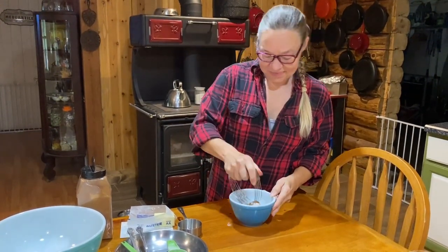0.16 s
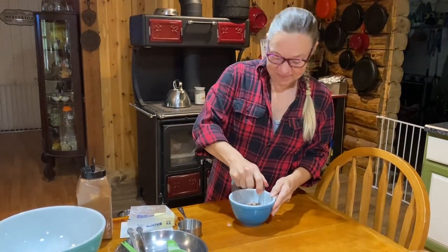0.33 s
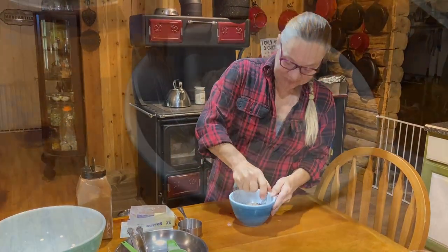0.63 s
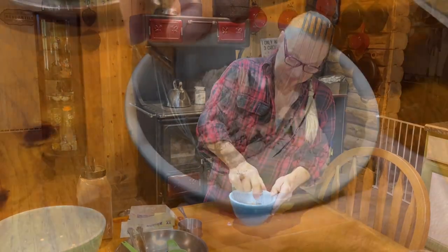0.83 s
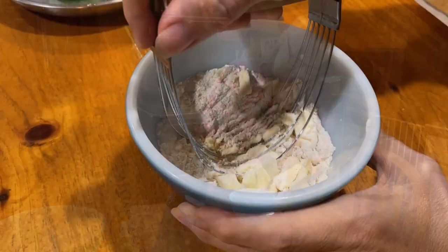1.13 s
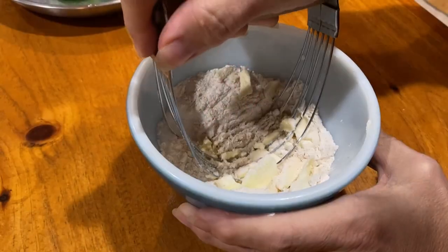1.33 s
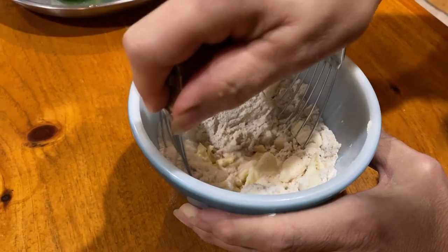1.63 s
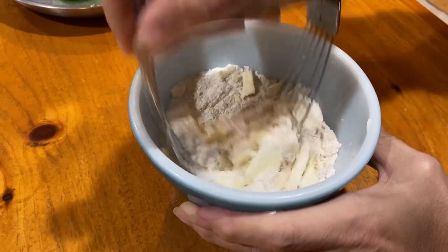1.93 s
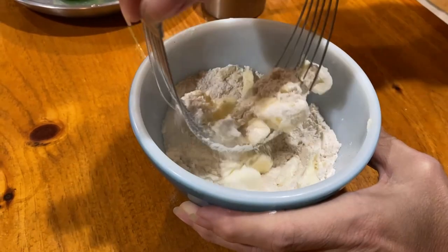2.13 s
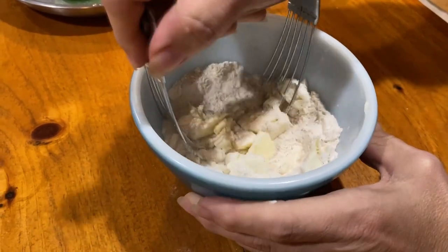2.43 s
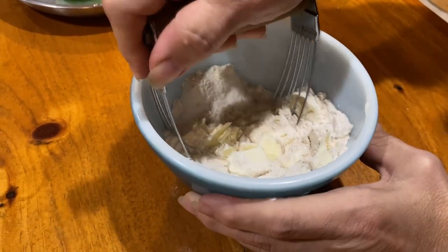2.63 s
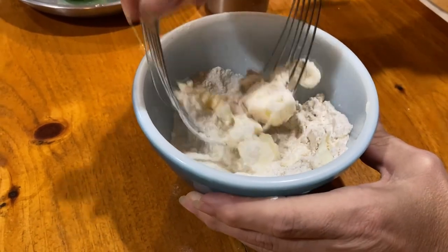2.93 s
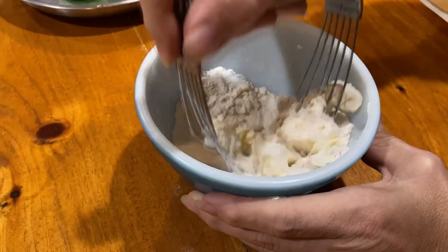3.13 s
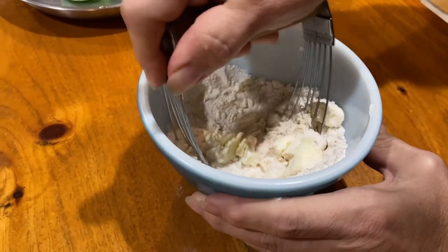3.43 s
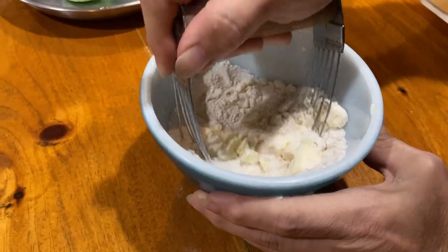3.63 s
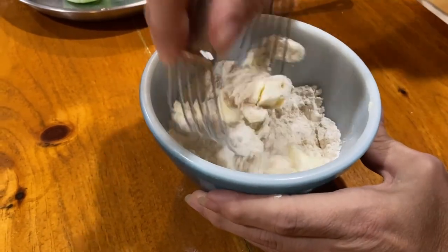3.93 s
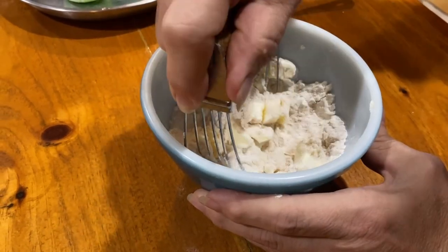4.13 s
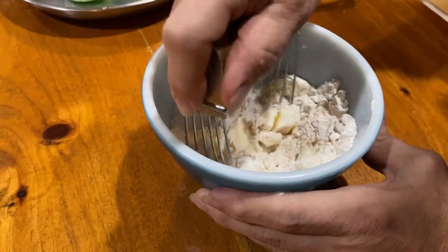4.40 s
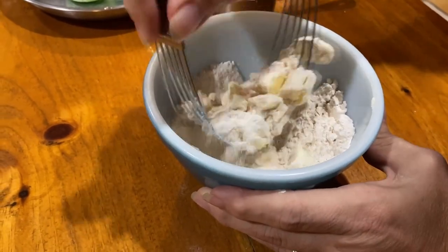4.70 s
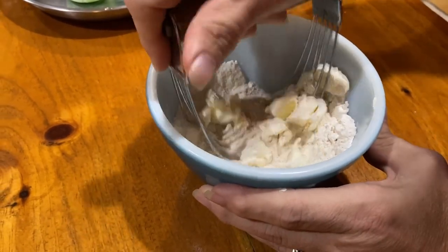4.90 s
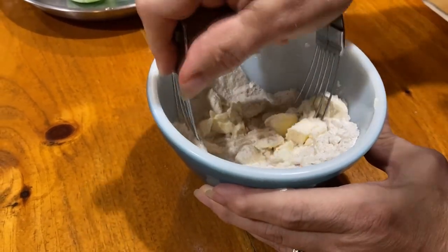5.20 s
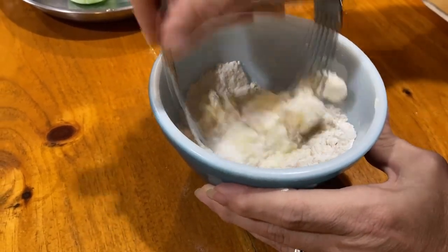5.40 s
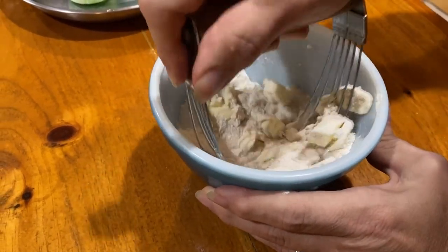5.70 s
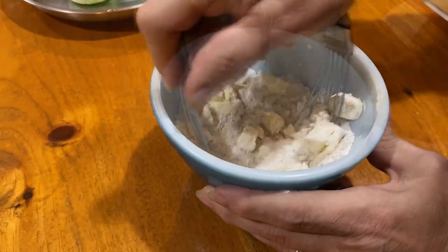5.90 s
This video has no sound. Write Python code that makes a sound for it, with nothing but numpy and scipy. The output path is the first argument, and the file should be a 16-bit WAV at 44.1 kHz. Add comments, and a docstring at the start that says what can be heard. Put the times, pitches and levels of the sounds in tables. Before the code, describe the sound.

A quiet wooden kitchen, heard in stereo on a phone. From 0 to 0.8 seconds it is far off: very faint taps and tiny knocks of a bowl on a table, with room reverberation. At 0.9 a stronger knock lands and the sound turns close, above the bowl, with soft room noise, low fridge hum and faint whine. Wires scrape grittily at 1.05 and 1.65, with ticks and a soft thump. From 2.15 to 2.65 a busy cluster of scrapes, clinks and heavy dull thuds follows. It eases into light scraping near 3, then a sharp click and thuds at 3.5 to 3.7. The hardest clacks and table knocks come at 4.2 to 4.3. Small ticks and scrapes follow; at 5.0 a thump and brief metallic wire twang, more strokes to 5.3, scrapes at 5.6 and a final tick and thud at 5.9.

```python
"""Faint ticks and knocks come first, heard by a phone across a wooden table, then all is close above a glass bowl.
Steel wires of a pastry cutter chop through flour and butter: cracks and ringing modes make the ticks,
filtered grains the scrape, and damped modes the thumps that each push sends into the table top.
Twanging wires are ringing noise, the fridge two wavering sines over noise, the wooden room a decaying noise tail."""
import sys
import numpy as np
from scipy import signal
from scipy.fft import rfft, irfft, next_fast_len
from scipy.io import wavfile
from scipy.ndimage import uniform_filter1d

SR = 44100
rng = np.random.default_rng(int(sys.argv[2]) if len(sys.argv) > 2 else 0)


def transcribe(u):
    """Save the signal u as a 16-bit wav file named by the first command-line argument.

    u: samples, shape (n,) or (channels, n), limited to [-1, 1]; the rate is SR.
    q: integer samples, one column per channel.
    """
    v = np.clip(np.atleast_2d(u).T, -1, 1)
    q = np.round(v * 32767).astype(np.int16)
    wavfile.write(sys.argv[1], SR, q)


N = 267025
CLOSE_FROM_S = .98  # heard from close above the bowl from here on


def undb(db):
    """dB to gain."""
    return 10 ** (np.asarray(db, float) / 20)


def unit(x):
    """Scale to rms 1."""
    return x / np.sqrt(np.mean(x ** 2))


def curve(s, v):
    """Straight lines between control points in seconds."""
    return np.interp(np.arange(N) / SR, s, v)


def colour(x, points):
    """Filter by (Hz, dB) points joined on a log frequency axis."""
    size = next_fast_len(x.shape[-1])
    hz = np.maximum(np.arange(size // 2 + 1) * SR / size, 1)
    p = np.array(points)
    gain = undb(np.interp(np.log(hz), np.log(p[:, 0]), p[:, 1]))
    return irfft(rfft(x, size) * gain, size)[..., :x.shape[-1]]


def band(x, lo_hz, hi_hz):
    """Band-pass."""
    return signal.sosfilt(signal.butter(3, [lo_hz, hi_hz], "bandpass", fs=SR, output="sos"), x)


def ring(x, hz, t60):
    """Drive one damped mode with x; a unit impulse gives amplitude 1."""
    w = 2 * np.pi * hz / SR
    r = np.exp(-np.log(1000) / (max(t60, .005) * SR))
    return signal.lfilter([0, np.sin(w)], [1, -2 * r * np.cos(w), r * r], x)


def grit(rate_hz, scatter_db):
    """Sparse random impulses of very uneven size, like grains."""
    on = rng.random(N) < rate_hz / SR
    impulses = on * rng.standard_normal(N)
    size_db = scatter_db * np.minimum(rng.exponential(size=N), 5.5)
    return unit(impulses * undb(size_db))


def walk(rate_hz):
    """Random movement: new random levels at this rate, joined by straight slews."""
    hold = int(SR / rate_hz)
    levels = np.repeat(rng.standard_normal(N // hold + 1), hold)
    return uniform_filter1d(levels, hold)[:N]


def burst(s, db, rise_ms, fall_ms):
    """Envelope of bursts that swell up to their moment and die away, both exponentially."""
    gate = np.zeros(N)
    gate[(np.asarray(s) * SR).astype(int)] = undb(db)
    t_ms = np.arange(-SR // 2, SR // 2 + 1) * 1000 / SR
    shape = np.exp(-np.abs(t_ms) / np.where(t_ms < 0, rise_ms, fall_ms))
    return np.abs(signal.fftconvolve(gate, shape, "same"))


def strike(blows, modes, spot_db, detune, rise_ms, choke_ms=np.inf):
    """Ring damped modes for each (s, dB for each mode); level and pitch of each mode scatter from blow to blow."""
    hz, mode_db, t60 = np.transpose(modes)[:, :, None]
    t = np.arange(SR // 2) / SR
    out = np.zeros(N + len(t))
    chance = rng.standard_normal((len(blows), 2, len(modes), 1))
    for (s, db), (spot, shift) in zip(blows, chance):
        decay = undb(db + mode_db + spot_db * spot - 60 * t / t60)
        rings = decay * np.sin(2 * np.pi * hz * (1 + detune * shift) * t)
        at = int(s * SR)
        out[at:at + len(t)] *= np.exp(-t * 1000 / choke_ms)  # still what rang before
        out[at:at + len(t)] += rings.sum(axis=0) * (1 - np.exp(-t * 1000 / rise_ms))
    return out[:N]


# Colour of the room tone. Each row: frequency in Hz, level in dB per Hz.
ROOM_TONE_COLOUR = [(15, -31), (25, 3.5), (48, -12.5), (309, -9.5), (363, -1), (414, -14.5), (6330, -25),
                    (14000, -55.5)]
# Room tone level over time: faint in the far shot, rising into the louder close one.
# Each row: time in seconds, level in dB.
ROOM_TONE_LEVEL = [(0, -80.5), (.45, -75), (.9, -65.5), (6.05, -66)]
# Fridge hum and whine. Each row: frequency in Hz, level in dB over the room tone.
FRIDGE_HUM = [(60, 8), (720, -1)]


def kitchen():
    """Wide noise as room tone with a wavering fridge hum; its high whine is heard only from close up."""
    mid, side = (unit(colour(rng.standard_normal(N), ROOM_TONE_COLOUR)) for _ in range(2))
    t = np.arange(N) / SR
    hum = np.zeros(N)
    for hz, db in FRIDGE_HUM:
        heard = (hz < 100) | (t > CLOSE_FROM_S)
        hum += undb(db + walk(37.0)) * np.sin(2 * np.pi * hz * t) * heard
    wide = 1.38 * side * np.array([[1], [-1]])
    return undb(curve(*np.transpose(ROOM_TONE_LEVEL))) * (mid + wide + hum)


ROOM_T60_S = 0.44  # bass decay; the treble's is 0.82 of it


def room(x):
    """Diffuse tail of the wooden room, shorter in the treble; the bass is alike left and right."""
    t = np.arange(SR // 2) / SR
    noise = rng.standard_normal((2, len(t))) * np.minimum(t / 0.0016, 1)
    low = signal.sosfilt(signal.butter(1, 400, fs=SR, output="sos"), noise)
    bass = low[0] * undb(-60 * t / ROOM_T60_S)
    treble = 0.8 * (noise - low) * undb(-60 * t / (0.82 * ROOM_T60_S))
    tail = bass + treble
    return signal.fftconvolve(x[None], tail / np.sqrt(np.sum(tail ** 2) / 2), axes=1)[:, :N]


CHOKE_MS = 8  # a new knock presses the top and stills what rang before
ROCK_DB, ROCK_RISE_MS, ROCK_FALL_MS = -23, 5.8, 43.2  # rocking around each knock, level against the knock
RUB_DB = 2  # rub of the bowl on the top, against the dull part of the scrape
# The bowl knocking on the table top; each knock has its own brightness, whatever its level. # Each row: start
# in seconds, level in dB, extra level of the upper modes in dB.
THUDS = [(0.122, -51, -4), (0.247, -47, -1), (0.51, -47, 6), (0.573, -44, 1), (0.707, -44.5, -5),
         (0.893, -4.5, 9), (1.639, -16.5, -8), (1.851, -20, 5), (2.174, -16.5, -2), (2.265, -12.5, 4),
         (2.313, -12, -13), (2.506, -1.5, -12), (2.548, -5, -6), (2.621, -7.5, 5.5), (2.844, -53, -8),
         (3.501, -6.5, -21.5), (3.534, -7.5, -23), (3.65, 1.5, 0), (3.687, -12.5, 8.5), (4.01, -24.5, -12),
         (4.188, -1, -8.5), (4.293, 3, -5), (4.332, 1.5, 2), (4.762, -11.5, -4), (5.017, -7, -8),
         (5.255, -20.5, -1.5), (5.874, -13.5, -3.5)]
# Modes of the table top. Each row: frequency in Hz, level in dB, 60 dB decay time in seconds.
TABLE_MODES = [(127.4, 5.5, 0.26), (152.4, 1.5, 0.22), (204, -3, 0.14), (263.5, -3.5, 0.19),
               (322.5, -24, 0.22), (376, -13, 0.1), (540, -26.5, 0.035)]


def table(dull_db):
    """Pushes ring the modes of the table top, and the bowl rocks and rubs on it as grit through the same modes."""
    mode_hz = np.array(TABLE_MODES)[:, :1]
    deep, high = mode_hz < 140, mode_hz > 180
    # the deepest modes reach the phone mostly when it is close above the top
    blows = [(s, db - 16.5 + upper_db * high - 12.5 * deep * (s < CLOSE_FROM_S))
             for s, db, upper_db in THUDS]
    knocks = band(strike(blows, TABLE_MODES, 2.94, 0.034, 5.4, CHOKE_MS), 70, 3300)

    # from afar the whole top and what stands on it rattle along: many dense modes, made as noise
    s, db, _ = np.transpose([row for row in THUDS if row[0] < CLOSE_FROM_S])
    dense = colour(rng.standard_normal(N), [(150, 15.5), (400, -8.5), (3000, -36.0)])
    rattle = burst(s, db - 5.5, 0.69, 35.2) * unit(band(dense, 263, 2500))

    rub = grit(300, 1.2)
    rubbed_top = sum(undb(mode_db) * ring(rub, hz, 0.32 * t60) for hz, mode_db, t60 in TABLE_MODES)
    s, db, _ = np.transpose(THUDS)
    rocking = burst(s, db + ROCK_DB, ROCK_RISE_MS, ROCK_FALL_MS)
    movement = np.hypot(rocking, undb(dull_db + RUB_DB))
    return knocks + rattle + movement * unit(rubbed_top)


# Single wires springing free or knocking together.
# Each row: time in seconds, pitch in Hz, level in dB, 60 dB decay time in seconds.
TWANGS = [(1.052, 1986, -31.5, .14), (3.377, 1830, -37, 0.037), (5.0126, 1220, -17.5, 0.046),
          (5.0143, 6580, -22, 0.018), (5.099, 6800, -41.5, 0.022), (5.161, 1280, -39, 0.046),
          (5.264, 3510, -37, 0.13)]


def twangs():
    """Each wire buzzes briefly against its neighbours: noise ringing around its own pitch."""
    out = np.zeros(N)
    for s, hz, db, t60 in TWANGS:
        buzz = unit(ring(rng.standard_normal(N), hz, 0.2 * t60))
        out += burst([s], db, 0.92, 1000 * t60 / np.log(1000)) * buzz
    return out


CHATTER_DB, CHATTER_HZ = 2.5, 130  # depth and rate of the wavering ring
JANGLE_DB, JANGLE_MS, JANGLE_UP = -11, 65, 0.01  # level against the ring, fall, rise in pitch (share)
JANGLE_FORCE = 0.26  # extra dB of jangle for each dB of blow: hard landings slide on, light ones just ping
GRIP_DETUNE = .007  # typical share by which the grip shifts the glass modes
# Wires striking the glass. Each row: start in seconds, crack level in dB, low body in dB,
# glass ring in dB, brightness in dB per octave.
TICKS = [(0.119, -44.5, -29, 2.5, -7), (0.7924, -66, -8, 7, 12.5), (0.8922, -28, 3.5, -18, -33),
         (1.047, -31.5, -34.5, -29, 3), (1.645, -28, -4.5, -35, -3), (1.85, -68.5, 28, -8, 0),
         (2.161, -25.5, -18, -0.5, 0), (2.2746, -37.5, 5, -5, -4), (2.4666, -37.5, 8, -11, -15),
         (2.4976, -21.5, 0, -20, -18.5), (2.5183, -31.5, 19.5, -5.5, -21), (2.566, -30.5, 0, -20, -31),
         (2.842, -50, -3, -31, -23), (3.4982, -15, -38, -11, -11), (3.6454, -46.5, 17, -14, -34),
         (4.0905, -42.5, 3, -2.5, -20.5), (4.1915, -13, 4, -14, -24), (4.2889, -14.5, -1, -14.5, -20.5),
         (4.4582, -54.5, 1, 12, 0), (4.482, -55, 15.5, -46, -12), (4.514, -56, -13, 17.5, -4),
         (4.598, -63.5, 17.5, -35, -13), (5.014, -44, 5, -42, -6), (5.1546, -32.5, 0.5, -24, -7.5),
         (5.2502, -26.5, -11.5, -8.5, -11.5), (5.61, -38.5, -27, 4.5, -7.5), (5.8799, -23.5, -26, -60, -13)]
# Modes of the filled glass bowl, shared with the scrape.
# Each row: frequency in Hz, level in dB, 60 dB decay time in seconds.
BOWL_MODES = [(680, -10, .05), (880, 6, .02), (1000, -5, .07), (1110, -6, .06), (1950, -14, .025),
              (2660, -2, .04), (2770, -1, .05), (5030, 2, .07), (5190, -1, .06), (7960, -9, .05)]
# Colour of a bare contact, shared with the scrape. Each row: frequency in Hz, level in dB per Hz.
CONTACT_COLOUR = [(240, -64.5), (400, -8.5), (900, 5.5), (3210, -8.5), (5200, -8), (7100, -11), (9210, -27),
                  (12300, -20.5), (15500, -39)]


def ticks():
    """Each blow: a short crack as the wires land, the low body of the filled bowl and its glass ring."""
    s, db, _, glass_db, tilt = np.transpose(TICKS)
    noise = colour(rng.standard_normal(N), CONTACT_COLOUR)
    dark, light = unit(band(noise, 1300, 4000)), unit(band(noise, 4000, 15000))
    crack = burst(s, db - 13.5 - tilt / 2, 1.6, 3.9) * dark
    crack += burst(s, db - 0.5 + tilt / 2, 1.6, 1.76) * light

    # after landing the wires slide on along the glass and keep its upper modes going
    slide = grit(1200, 2.4)
    upper = unit(sum(undb(mode_db) * ring(slide, hz * (1 + JANGLE_UP), t60 * 1.8)
                     for hz, mode_db, t60 in BOWL_MODES[5:]))
    jangle_db = db + glass_db + JANGLE_DB + JANGLE_FORCE * (db + 21.0)
    jangle = burst(s, jangle_db, 2.5, JANGLE_MS) * upper

    # wires chatter against the ringing glass, so its ring wavers
    chatter = undb(CHATTER_DB * walk(CHATTER_HZ))
    octave = np.log2(np.array(BOWL_MODES)[:, :1] / 3700)
    blows = [(s, db + np.where(octave < -1.3, low_db, ring_db + tilt * octave))
             for s, db, low_db, ring_db, tilt in TICKS]
    glass = strike(blows, BOWL_MODES, 0.31, GRIP_DETUNE, 0.79)
    return (glass + twangs() + jangle) * chatter + crack


SWELL_DB = 20  # how far a stroke grows over its swell and dies over its fade
# Wires dragged through the flour. Each row: loudest moment in seconds, swell in seconds, fade in seconds,
# scrape level in dB, dull share in dB, flour hiss in dB.
STROKES = [(0.31, 0.31, 0.037, -69.5, -2, -5.5), (0.508, 0.016, 0.079, -55.5, -3.5, -29.5),
           (1.06, 0.19, 0.15, -50, -1.5, -25), (1.351, 0.81, 1, -65, 5, -16),
           (1.694, 0.22, 0.053, -39.5, 1, -13.5), (2.192, 0.014, 0.25, -46, 1, -12.5),
           (2.273, 0.06, 0.05, -40, 5.5, -11), (2.527, 0.12, 0.045, -38.5, 9.5, -8.5),
           (2.607, 0.57, 0.18, -47, 7, -19), (2.85, 0.036, 0.1, -64.5, 10, -27),
           (3.151, 0.13, 0.12, -49.5, -3, -19), (3.35, 0.15, 0.13, -50.5, 3, -18.5),
           (3.528, 0.23, 0.23, -49, 3.5, -33), (3.987, 0.045, 0.87, -53.5, 2.5, -16.5),
           (4.21, 0.1, 0.1, -41, -0.5, -29), (4.29, 0.15, 0.069, -39.5, 6.5, -13),
           (4.5, 0.16, 0.064, -51, 3, -49), (4.795, 0.064, 1, -54, 4.5, -17),
           (4.909, 0.096, 0.17, -46, -11, -34.5), (5.04, 0.23, 0.12, -46.5, 0.5, -15),
           (5.162, 0.12, 0.044, -49.5, 10.5, -11.5), (5.283, 0.064, 0.12, -50, -4.5, -35),
           (5.624, 0.11, 0.12, -46, -2.5, -13), (5.873, 0.18, 0.11, -46.5, 2, -16)]


def strokes():
    """Scrape level, dull share and hiss over time; strokes add in power and the louder one sets the colour."""
    s, swell, fade, db, low_db, hiss_db = np.transpose(STROKES)[:, :, None]
    t = np.arange(0, N, 64) / SR
    away = np.where(t < s, (s - t) / np.maximum(swell, .005), (t - s) / np.maximum(fade, .005))
    power = undb(np.maximum(db - SWELL_DB * away, -140)) ** 2
    total = power.sum(axis=0)
    level_db = 10 * np.log10(total)
    dull_share_db = (power * low_db).sum(axis=0) / total
    flour_db = (power * hiss_db).sum(axis=0) / total
    return [curve(t, c) for c in (level_db, dull_share_db, flour_db)]


PATCH_DB, PATCH_HZ = 3.5, 18.0  # how far and how fast the scrape's colour shifts


def scrape(db, low_db, hiss_db):
    """Wires drag through flour: dense grains, heard bare and through the bowl's modes."""
    flicker = undb(2.2 * walk(150))
    grains = flicker * (grit(2000, 1.83) + 1.04 * rng.standard_normal(N))
    bare = colour(grains, CONTACT_COLOUR)
    glass = sum(undb(mode_db) * ring(grains, hz, t60) for hz, mode_db, t60 in BOWL_MODES)
    edges_hz = [(450, 1500), (1500, 2400), (2400, 9000), (9800, 15000)]
    dull, mid, bright, hiss = (unit(unit(band(bare, *e)) + undb(-12.0) * unit(band(glass, *e)))
                               for e in edges_hz)
    # dry flour that hisses is also brighter further down, and so is a harder stroke
    bright_db = 0.63 * hiss_db + 0.23 * db + 17.5
    mix = undb(-0.5) * mid + undb(bright_db) * bright + undb(low_db) * dull + undb(hiss_db) * hiss
    drag = undb(db) * mix
    # crumbs of every size pass under the wires, so narrow ranges flare up and die on their own
    steps_hz = np.geomspace(350, 16000, 19)
    return sum(undb(PATCH_DB * walk(PATCH_HZ)) * band(drag, lo, hi)
               for lo, hi in zip(steps_hz, steps_hz[1:]))


ROOM_DB, FAR_ROOM_DB = -10.5, -1.5  # room send close above the bowl and from across the table


def scene():
    """Bowl and table, direct and through the room, over the room tone."""
    db, low_db, hiss_db = strokes()
    bowl = ticks() + scrape(db, low_db, hiss_db)
    top = table(db + low_db)
    wet_db = np.where(np.arange(N) < CLOSE_FROM_S * SR, FAR_ROOM_DB, ROOM_DB)
    tail = room((bowl + undb(-6.5) * top) * undb(wet_db))
    return bowl + top + tail + kitchen()


TOP_HZ = 15700  # the phone cuts everything above
# How the phone's left port hears against the right.
# Each row: frequency in Hz, lateness in radians, extra level in dB.
PORTS = [(300, .55, 0), (2000, 1.1, 4), (3400, 1.3, 1), (4100, .4, 1), (5500, -3, 0), (6900, -1, 7),
         (8900, -3.1, 1), (14400, -8.9, 0)]


def record(dry):
    """The two ports differ in phase and level; the phone thins the deep bass and cuts the top."""
    size = next_fast_len(N)
    bins_hz = np.arange(size // 2 + 1) * SR / size
    hz, late, left_db = np.transpose(PORTS)
    halves = np.array([[.5], [-.5]])  # each port takes half the difference
    turn = np.interp(bins_hz, hz, late) * halves
    lean_db = np.interp(bins_hz, hz, left_db) * halves
    ports = irfft(rfft(dry, size) * undb(lean_db) * np.exp(-1j * turn), size)[:, :N]
    thin = signal.sosfilt(signal.butter(2, 55, "highpass", fs=SR, output="sos"), ports)
    return signal.sosfilt(signal.ellip(10, .2, 80, TOP_HZ, fs=SR, output="sos"), thin)


dry = scene()
out = record(dry)
transcribe(out)
```